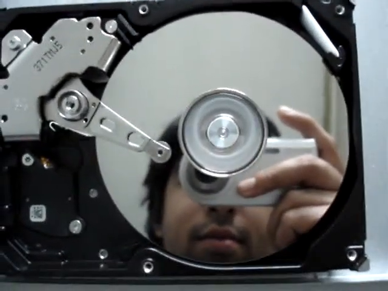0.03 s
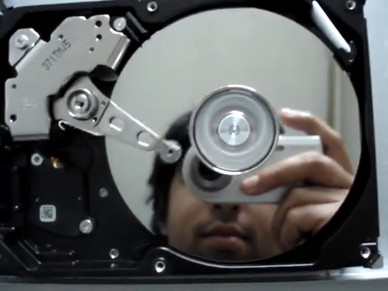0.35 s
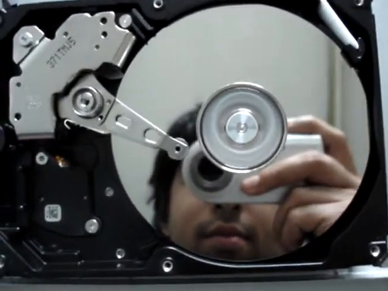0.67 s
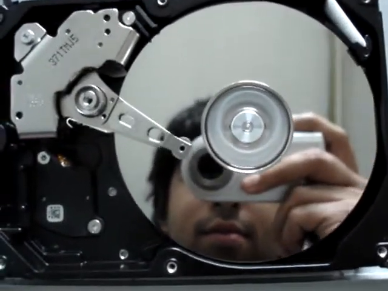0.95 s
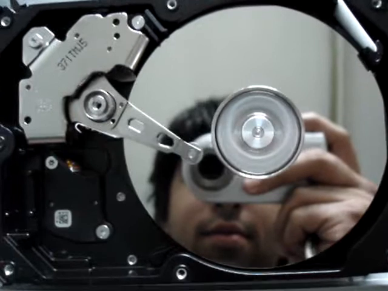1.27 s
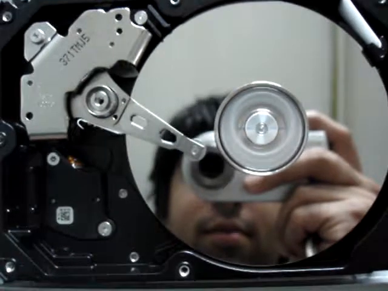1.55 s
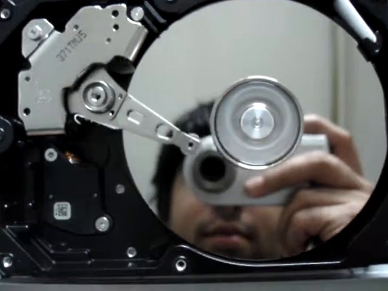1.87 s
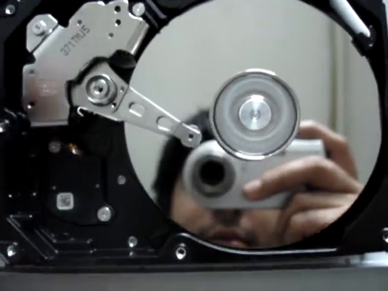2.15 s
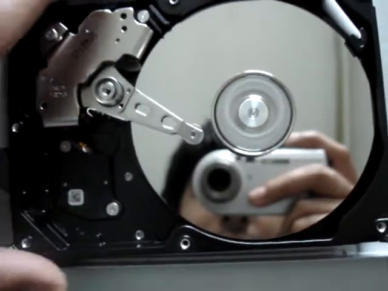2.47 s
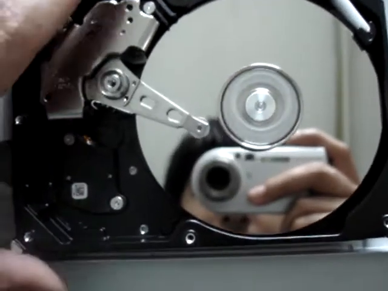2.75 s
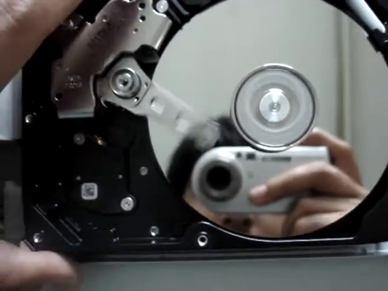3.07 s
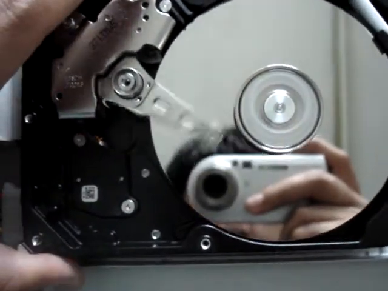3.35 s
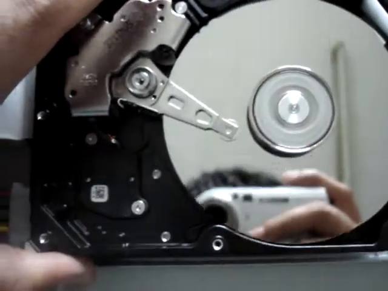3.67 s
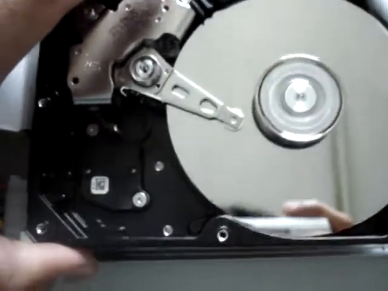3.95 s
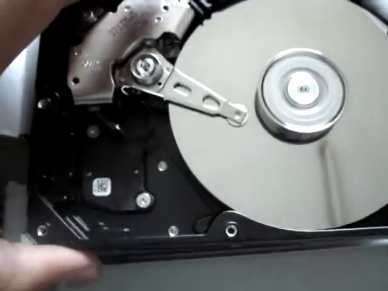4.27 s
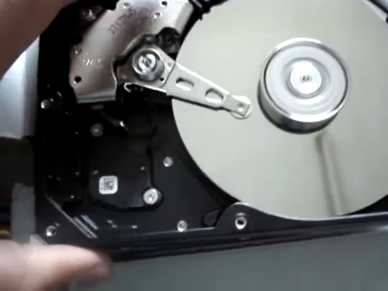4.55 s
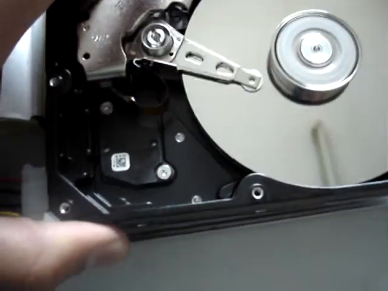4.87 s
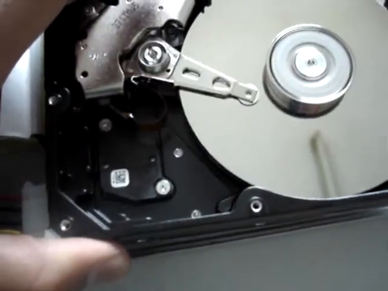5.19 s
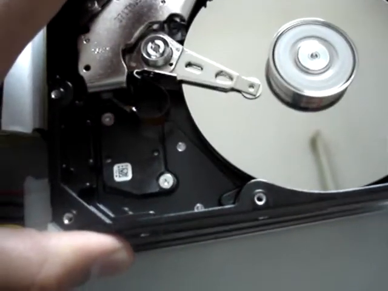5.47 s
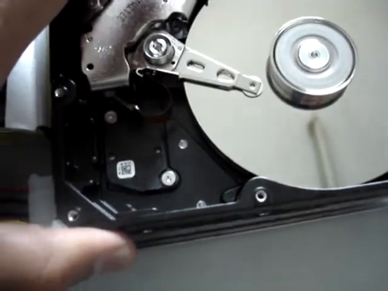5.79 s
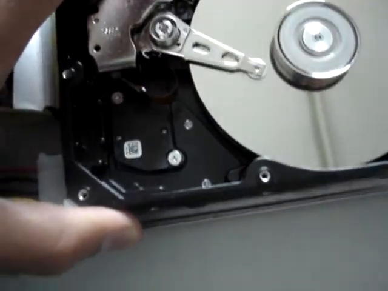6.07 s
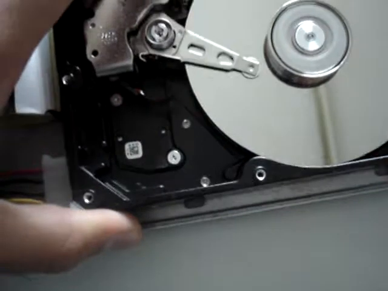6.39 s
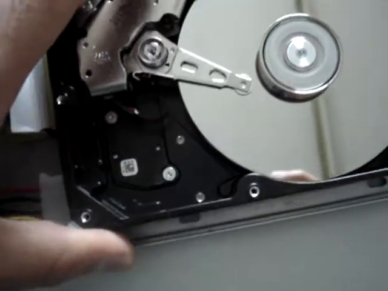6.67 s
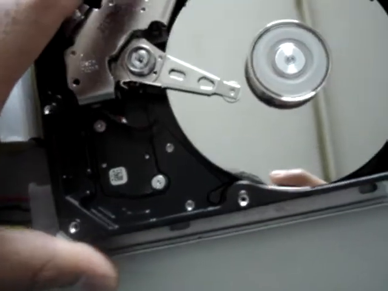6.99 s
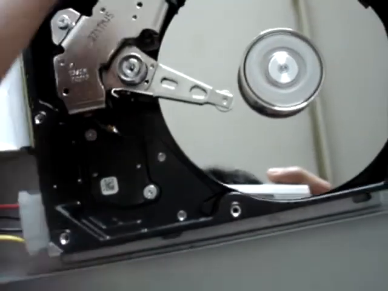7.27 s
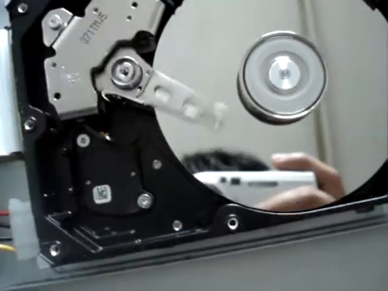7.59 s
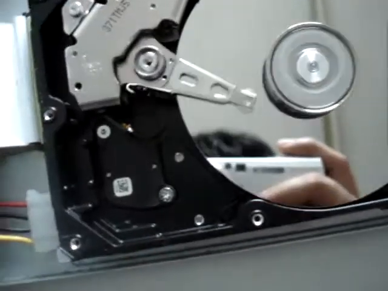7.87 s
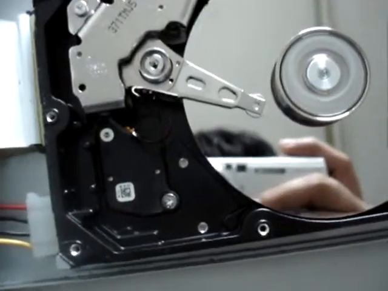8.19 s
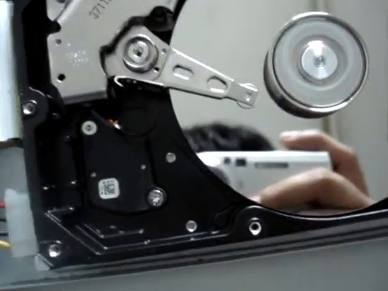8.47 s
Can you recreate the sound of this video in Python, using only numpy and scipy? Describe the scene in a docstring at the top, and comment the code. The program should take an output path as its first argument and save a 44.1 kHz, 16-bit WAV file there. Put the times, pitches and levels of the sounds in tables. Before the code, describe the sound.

A steady rush of air and a high whirr come from the spinning platter of an open hard drive, over a faint motor hum. The read arm repeats a small click and tick pair six times at an even, unhurried pace. Heard up close indoors on a hand-held microphone, the hiss turns a little brighter midway. A soft finger bump comes just before the last pair of clicks.

```python
"""Open hard drive, up close

Air dragged round by the platter rings the disk and casing, and the spindle hums on multiples of its
turning rate. Every second and a half the head arm clicks off its inner stop, sweeps through the air
stream and lands with a tick and a small bounce. The tone shifts as the hand-held camera tilts."""
import sys
import numpy as np
from scipy import signal
from scipy.fft import rfft, irfft
from scipy.io import wavfile

SR = 44100
rng = np.random.default_rng(int(sys.argv[2]) if len(sys.argv) > 2 else 0)


def inscribe(sig):
    """Save sig as 16-bit PCM at rate SR to the path in sys.argv[1].

    A 1-D sig is mono; a 2-D sig holds one channel per row.
    Samples are clipped to [-1, 1] before scaling.
    """
    pcm = np.round(np.clip(np.atleast_2d(sig).T, -1, 1) * 32767)
    wavfile.write(sys.argv[1], SR, pcm.astype(np.int16))


N = 381024
TIME = np.arange(N) / SR
FREQS = np.maximum(np.arange(N // 2 + 1) * SR / N, 1)

# The platter's low ring, the body of the sound: (centre [Hz], half-width [Hz], relative level [dB])
LOW_RING = [(1950, 188, -3), (1800, 220, -12), (1126, 110, -18), (1510, 190, -20.5)]
# Its upper ring: (centre [Hz], half-width [Hz], relative level [dB])
HIGH_RING = [(2705, 140, -1.5), (2885, 215, -4), (2470, 90, -14.5), (3636, 120, -8)]
# Fader ride on both rings as the camera moves: (time [s], level [dB])
RING_RIDE = [(0, -24.5), (2.1, -25), (2.7, -26), (3.5, -24.5), (5.2, -24), (6.9, -25.5), (7.5, -24.9),
             (7.9, -23), (8.64, -23)]
# The casing's ring: (centre [Hz], half-width [Hz], relative level [dB])
CASING_MODES = [(3240, 320, -2.5), (4300, 350, -6.5), (4930, 330, -8.5)]
# Fine hiss off the platter's rim: (frequency [Hz], relative level [dB])
RIM_HISS_EQ = [(4500, -16.5), (6800, -13), (7500, -2), (8200, 6), (9100, 6), (9800, 1.5), (11000, -9)]
# Bright sheen in front of the platter: (centre [Hz], half-width [Hz], relative level [dB])
FACE_MODES = [(4380, 180, -3.5), (5200, 57, 2), (6350, 240, 0.5), (7490, 170, -3.5), (10370, 280, -7)]
# Broad bed of rushing air: (frequency [Hz], relative level [dB])
RUSH_EQ = [(25, -19.5), (80, -24.5), (170, -17), (320, -6), (560, -6.5), (900, -5.5), (1350, -3.5),
           (1750, -0.5), (2300, -2), (3500, 0), (5650, -0.5), (6400, -2), (7000, -1.5), (7800, -2),
           (9000, -14)]
def windage(arm_lift_db=2.0, flutter_db=0.5, buffet_db=0.44):
    """Turbulent air rings platter and casing and hisses; the arm out in the fast stream stirs it more."""
    arm_out = sum(np.sin(np.pi * np.clip((TIME - start) / length, 0, 1))
                  for start, length, _, _ in ARM_SWEEPS)
    swell_db = arm_lift_db * arm_out
    ride_db = curve(RING_RIDE)
    low = noise(resonances(LOW_RING)) * undb(ride_db - 4 + swell_db + flutter_db * wander(25))
    high = noise(resonances(HIGH_RING)) * undb(ride_db - 2 + flutter_db * wander(25))
    casing = noise(resonances(CASING_MODES)) * undb(tilted(face_db=-35, change_db=5.5) + swell_db)
    hiss = noise(eq(RIM_HISS_EQ)) * undb(tilted(face_db=-43.5, change_db=6))
    sheen = noise(resonances(FACE_MODES)) * undb(tilted(face_db=-36, change_db=-1))
    rush = noise(eq(RUSH_EQ)) * undb(-28)
    return (low + high + casing + hiss + sheen + rush) * undb(buffet_db * wander(24))


# The arm's metallic ring: (pitch [Hz], t60 [s], relative click level [dB], relative tick level [dB])
ARM_MODES = [(1488, 0.025, -12, -0.5), (1810, .012, -2, 4), (2437, 0.046, 3.5, -10.5), (2850, 0.02, -1, 2),
             (3620, .0088, 4, -14), (4450, 0.014, 2, -4), (5170, 0.0079, -4, -10), (6100, 0.012, -1, 1),
             (7060, .012, -14, -2), (8160, 0.0051, -12, -10), (10070, 0.011, -10, -11)]
def arm_knock(landing, contact_s, scrape):
    """A short, rough contact rings the arm's modes; the hit has the energy of 5 ms at rms 1."""
    t = TIME[:SR // 8]
    hz, t60, click_db, tick_db = np.transpose(ARM_MODES)
    phase = rng.uniform(0, 2 * np.pi, (len(hz), 1))
    modes = decay(t, t60[:, None]) * np.sin(2 * np.pi * hz[:, None] * t + phase)
    attack = 1 - np.exp(-t / contact_s)
    ring = undb(tick_db if landing else click_db) @ modes * attack
    chatter = rng.standard_normal(len(t)) * t / contact_s * np.exp(-t / contact_s)
    low_cut = signal.butter(4, 1150, "high", fs=SR, output="sos")  # the knocks carry no bass
    hit = signal.sosfilt(low_cut, ring + scrape * chatter)
    return hit / np.linalg.norm(hit) * np.sqrt(.005 * SR)


# Cues for the arm's trips out and back: (time [s], length [s], click level [dB], tick level [dB])
ARM_SWEEPS = [(.1218, .2497, -15.8, -23), (1.6278, .2442, -16.8, -21.5), (3.136, .2468, -14.4, -17.5),
              (4.6478, .2487, -16.3, -20), (6.1565, .241, -17, -19.5), (7.6662, .2463, -15.7, -18.5)]
def head_arm(bounce_s=.0295, bounce_db=-4):
    """The arm leaves its stop with a bright click, lands with a duller tick and bounces once."""
    out = np.zeros(N)
    for start, length, click_db, tick_db in ARM_SWEEPS:
        click = arm_knock(landing=False, contact_s=.001, scrape=.45)
        tick = arm_knock(landing=True, contact_s=.002, scrape=.35)
        bounce = arm_knock(landing=True, contact_s=.0014, scrape=.4)
        add(out, start, undb(click_db) * click)
        add(out, start + length, undb(tick_db) * tick)
        add(out, start + length + bounce_s, undb(tick_db + bounce_db) * bounce)
    return out


# The motor's chord: (harmonic [x turning rate], face-on level [dB], change at full tilt [dB])
SPINDLE_TONES = [(1, -73.5, 1), (2, -69, -3), (3, -69.5, -3.5), (4, -68.5, 1), (6, -54, -9), (8, -62, 7),
                 (9, -64, 1.5), (10, -56.5, -6.5), (12, -63, 5), (14, -55, 8)]
# The camera drifts through spots where one tone blooms: (time [s], harmonic [x turning rate], lift [dB])
HOT_SPOTS = [(3.4, 9, 10.5), (3.9, 8, 8.5), (7.3, 14, 3.5), (7.4, 6, 4.5)]
def spindle(turn_hz=51.1, waver_db=1.7, spot_half_width_s=0.83, mains_hz=120, drone_hz=48.5):
    """Slowly wavering motor tones, locked to the shaft, sit over mains hum and a low drone."""
    shaft_angle = 2 * np.pi * np.cumsum(turn_hz * (1 + 0.00087 * wander(2.7))) / SR
    tones = 0
    for harmonic, face_db, change_db in SPINDLE_TONES:
        bloom_db = sum(lift_db * np.exp(-((TIME - at) / spot_half_width_s) ** 2)
                       for at, spot_harmonic, lift_db in HOT_SPOTS if spot_harmonic == harmonic)
        level_db = tilted(face_db, change_db) + bloom_db + waver_db * wander(2)
        tones += undb(level_db) * np.sin(harmonic * shaft_angle + rng.uniform(0, 2 * np.pi))
    hum = undb(tilted(face_db=-62, change_db=-7.5)) * np.sin(2 * np.pi * mains_hz * TIME)
    drone = undb(-72) * np.sin(2 * np.pi * drone_hz * TIME)
    return np.sqrt(2) * (tones + hum + drone)


# Soft finger thuds: (time [s], level [dB], centre [Hz], t60 [s])
FINGER_BUMPS = [(1.62, -41, 22, .18), (3.132, -50, 28, .12), (7.611, -30, 220, .13), (7.822, -46, 27, .13)]
def handling(attack_s=.005):
    """Fingers bump the camera and the drive: quickly damped thuds with no clear pitch."""
    out = np.zeros(N)
    for start, level_db, hz, t60 in FINGER_BUMPS:
        t = np.maximum(TIME - start, 0)
        press = 1 - np.exp(-(t / attack_s) ** 2)
        body = noise(resonances([(hz, 0.95 * hz, 0)]))
        out += undb(level_db) * press * decay(t, t60) * body
    return out


# The camera's move from the platter's face (0) towards its rim (1): (time [s], tilt [0-1])
CAMERA_TILT = [(0, 0), (2.7, 0.02), (3.7, .45), (4.5, 0.88), (6.3, 1), (7.5, .28), (8.64, 0.7)]
def tilted(face_db, change_db):
    """Level ride in dB for a source that radiates differently towards face and rim."""
    return face_db + change_db * curve(CAMERA_TILT)


def undb(db):
    """Decibels to gain."""
    return 10 ** (np.asarray(db) / 20)


def decay(t, t60):
    """A tail that falls 60 dB in t60 seconds."""
    return np.exp(-np.log(1000) * t / t60)


def curve(rows):
    """Straight ramps between (time, value) breakpoints."""
    return np.interp(TIME, *np.transpose(rows))


def noise(gain):
    """Noise of rms 1, shaped by a gain at each frequency."""
    x = irfft(rfft(rng.standard_normal(N)) * gain, N)
    return x / x.std()


def eq(points):
    """Gain at each frequency from (Hz, dB) points."""
    hz, db = np.transpose(points)
    return undb(np.interp(np.log(FREQS), np.log(hz), db))


def resonances(modes):
    """Gain at each frequency of steep-sided resonances, stirred independently."""
    power = 0
    for hz, half_width, db in modes:
        detune = (FREQS / hz - hz / FREQS) * hz / (2 * half_width)
        power += (undb(db) / (1 + detune ** 2)) ** 2
    return np.sqrt(power)


def wander(rate_hz):
    """Random drift of spread 1, moving at up to about rate_hz."""
    return noise(1 / (1 + (FREQS / rate_hz) ** 2))


def add(out, start, x):
    """Mix x into out at start seconds."""
    i = int(start * SR)
    out[i:i + len(x)] += x[:len(out) - i]


def scene():
    """All layers reach one microphone, the same in both channels."""
    mono = windage() + spindle() + head_arm() + handling()
    return np.array([mono, mono])


def record(dry, top_hz=9930):
    """The camera cuts the top end steeply."""
    return signal.sosfilt(signal.ellip(12, .1, 80, top_hz, fs=SR, output="sos"), dry)


dry = scene()
out = record(dry)
inscribe(out)
```